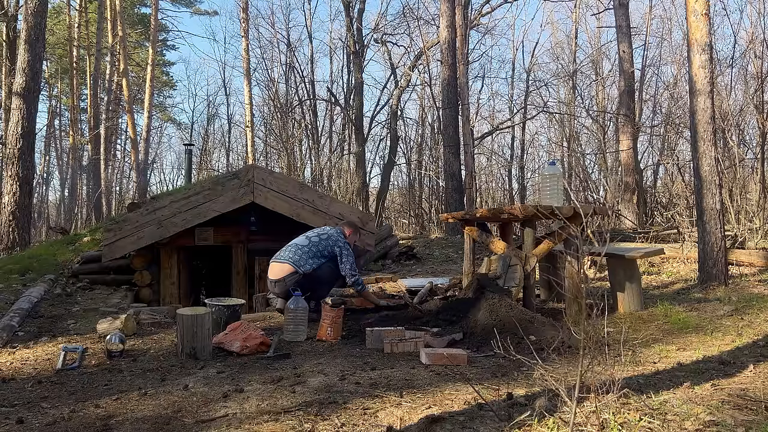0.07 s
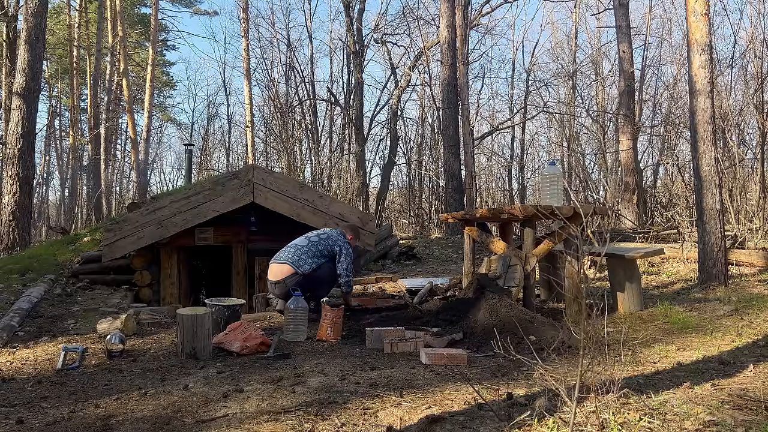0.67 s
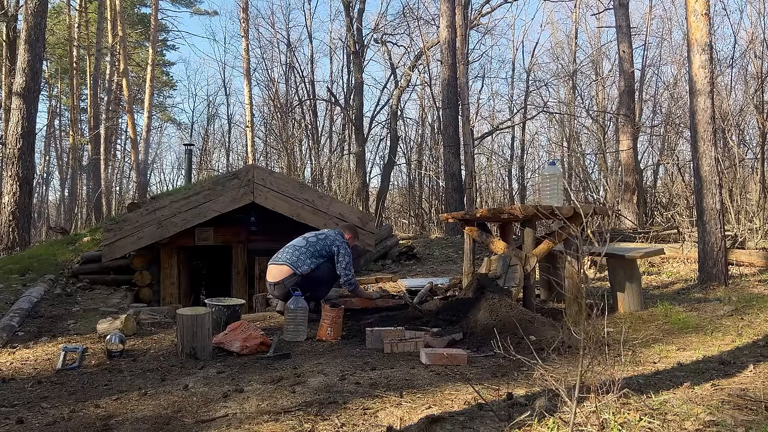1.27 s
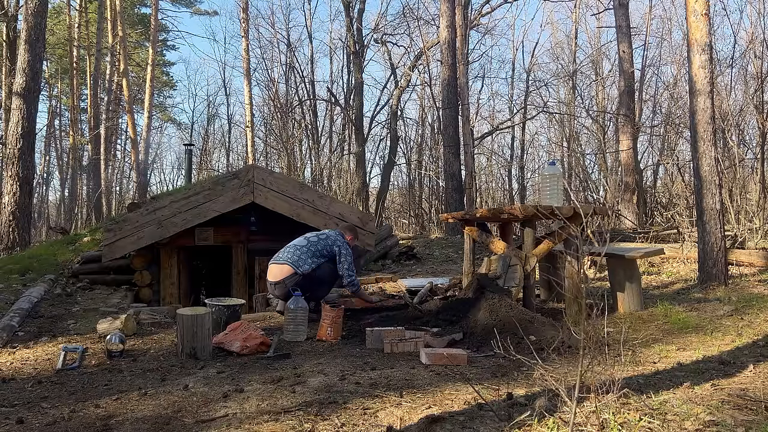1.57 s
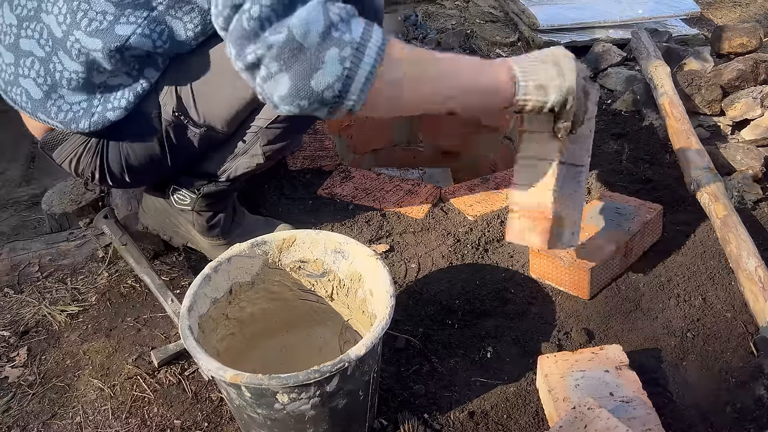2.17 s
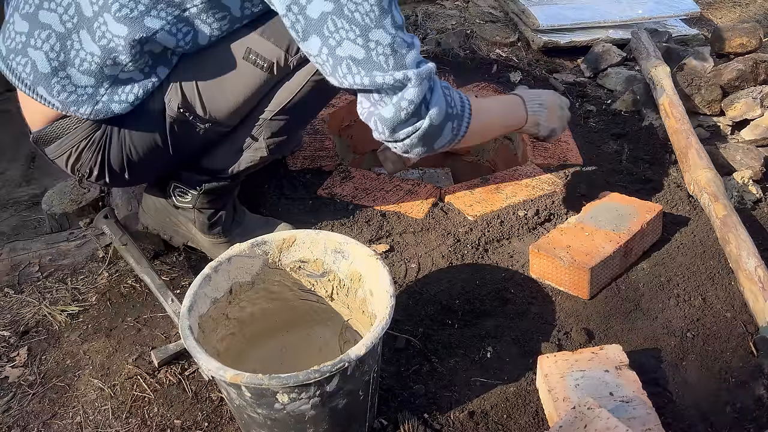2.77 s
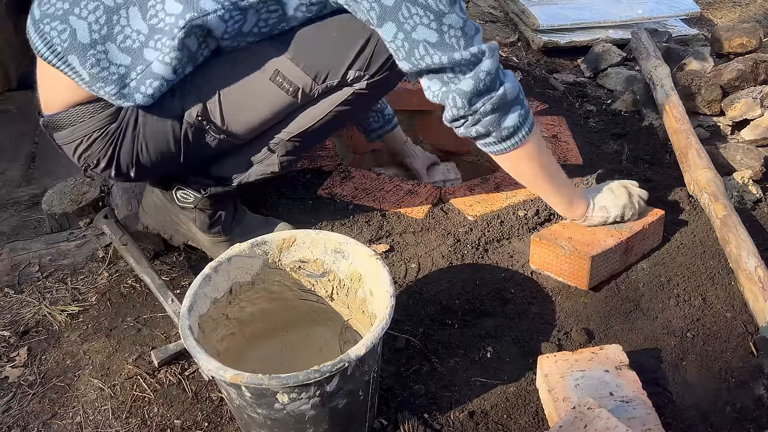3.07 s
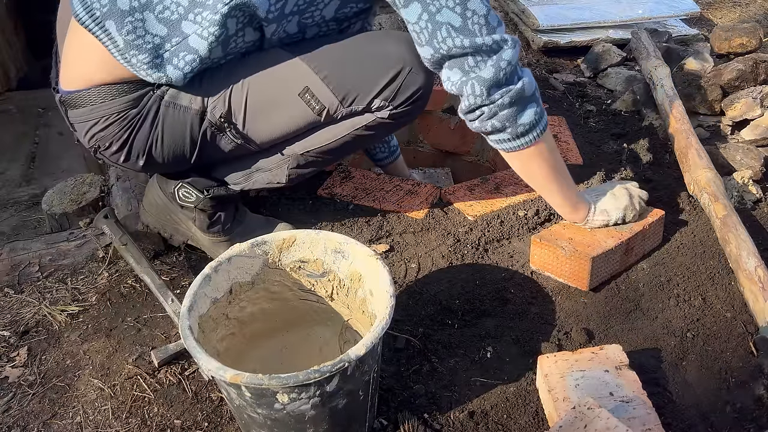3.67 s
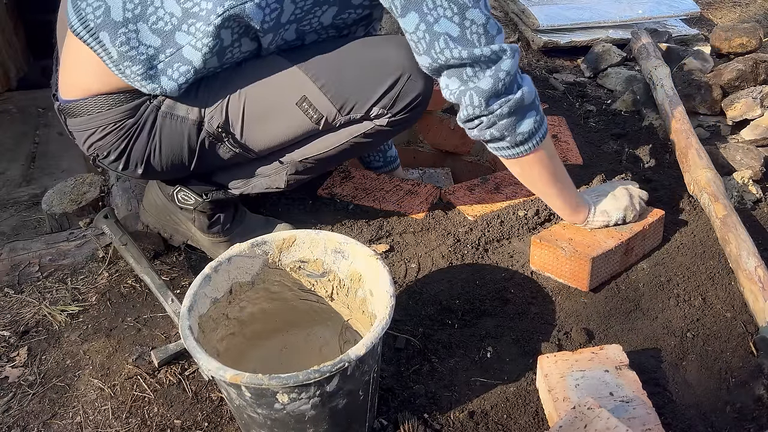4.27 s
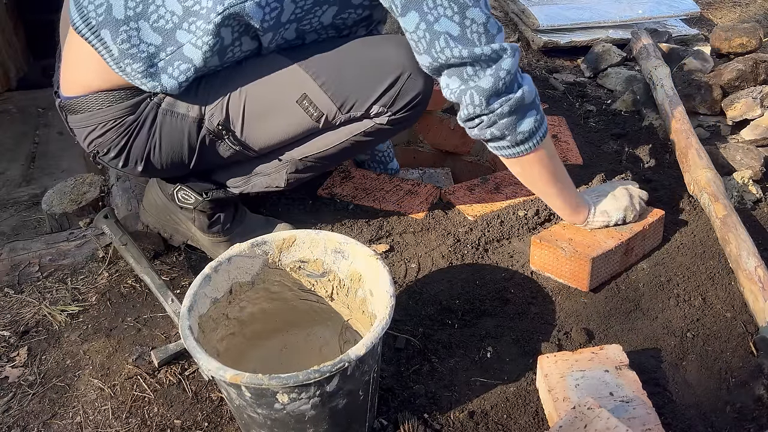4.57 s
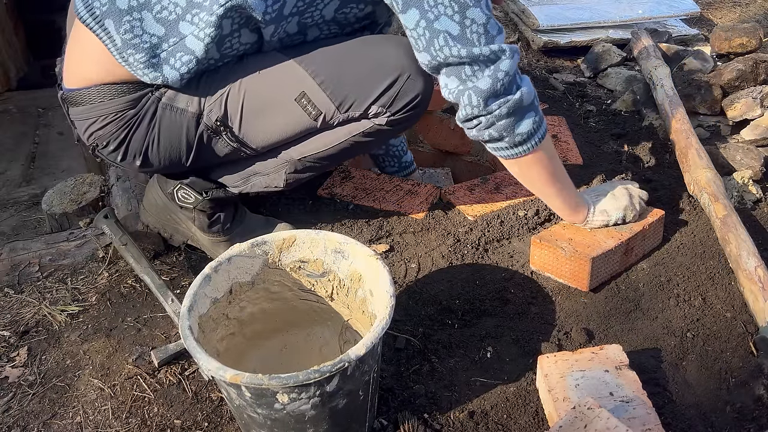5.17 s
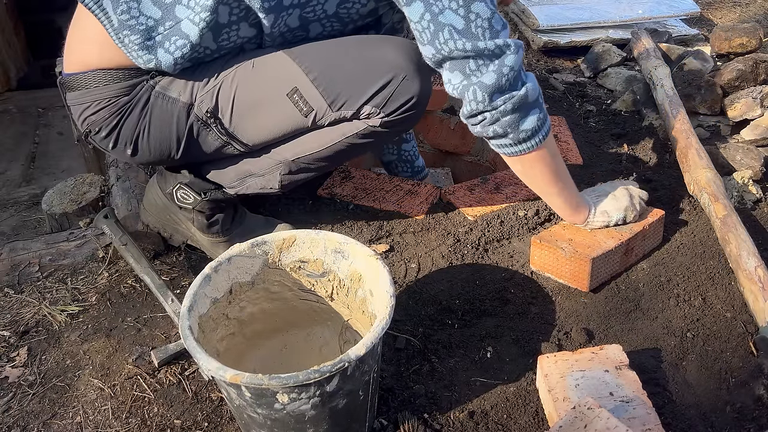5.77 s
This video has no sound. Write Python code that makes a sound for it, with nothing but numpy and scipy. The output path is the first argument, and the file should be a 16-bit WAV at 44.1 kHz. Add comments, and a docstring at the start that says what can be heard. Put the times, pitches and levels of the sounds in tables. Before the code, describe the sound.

Dull, gritty thumps of bricks being set down on soil, close up, amid fabric swishes, soft birdsong and a quiet forest hush.

```python
"""Clay bricks are set down on packed earth and against each other, close up in a forest clearing.
Each landing is a crunch of sand, a short damped knock and a dull thump as the ground gives way.
A brick scrapes through soil, grit crackles, and clothes swish as fabric rubs on fabric.
Behind them a small bird whistles, a farther one warbles through the trees,
and light gusts rumble on the microphone over the hush of the forest."""
import sys
import numpy as np
from scipy import signal
from scipy.fft import rfft, irfft
from scipy.io import wavfile
from scipy.ndimage import uniform_filter1d

SR = 44100
rng = np.random.default_rng(int(sys.argv[2]) if len(sys.argv) > 2 else 0)


def dump_mix(stems):
    """Bounce the given channels to the path in sys.argv[1] as a 16-bit WAV at rate SR."""
    frames = np.atleast_2d(stems).T  # one column per channel
    limited = np.clip(frames, -1, 1)  # hard clip at full scale
    pcm = np.round(limited * 32767).astype(np.int16)
    wavfile.write(sys.argv[1], SR, pcm)


N = 264996
TIME = np.arange(N) / SR
FREQS = np.fft.rfftfreq(N, 1 / SR)


# Weight landing on earth: start_s, level_db, pitch_hz, rebound_gain_db
LANDINGS = [(1.452, -20.5, 140, -3.5), (1.651, -35, 496, 5), (1.668, -17, 145, -8),
            (1.7146, -29.5, 500, -13), (2.150, -32, 227, -2), (2.208, -33, 69, -3.5), (2.259, -34, 53, -8),
            (2.3225, -42.5, 385, -1.5), (2.42, -32, 62, -23), (2.9265, -36, 750, -16),
            (3.182, -40.5, 234, -3), (3.4513, -10.2, 121.5, -16.5), (3.608, -27, 63, -29),
            (3.6447, -31, 82.3, -9), (4.305, -31.5, 60.3, -16), (4.843, -24.5, 67.6, -20),
            (5.0, -21.5, 123.5, -19), (5.692, -38.5, 179, -22)]

def ground_thuds(rise_cycles=1.35):
    """The earth thumps, the brick rocks faster on it, and the wider ground rebounds lower and slower."""
    out, t = np.zeros(N), np.arange(SR // 2) / SR
    for start, db, hz, rebound_db in LANDINGS:
        rise = rise_cycles / hz  # low thuds have a softer attack
        body = thump(t, hz, rise, steepness=2.6)
        rocking = undb(-22) * thump(t, hz * 2.13, rise * 0.96, steepness=3.0)
        rebound = undb(rebound_db) * thump(t, hz * 0.545, rise * 2.92, steepness=4.9)
        add(out, start, undb(db) * (body + rocking + rebound))
    return out


def thump(t, hz, rise, steepness, sag=0.025):
    """Soil gives way and springs back for a few cycles; the pitch sags as the load comes off."""
    swell = (t / rise * np.exp(1 - t / rise)) ** steepness
    pitch = hz * (1 + sag * (2 * np.exp(-t / rise / 2) - 1))
    return swell * np.sin(2 * np.pi * np.cumsum(pitch) / SR)


# A brick touching down: start_s, level_db, grind_s, brightness_hz, knock_gain_db, flat_gain_db
TOUCHDOWNS = [(1.4435, -30.5, 0.014, 2180, 0.5, -8), (1.6682, -26.5, 0.0034, 2500, 0.5, -10.5),
              (2.1515, -33.5, .004, 1900, 1.5, -9), (2.9258, -37, 0.0043, 1260, -4.5, -4),
              (3.1803, -32.5, .0035, 1880, -1.5, -8), (3.4450, -38, 0.01, 1680, 7.5, 4.5),
              (3.505, -45, 0.0043, 1200, -15, -10), (3.5758, -47.5, 0.003, 2000, -14, -2),
              (5.916, -43.5, 0.0019, 2000, -7, -15)]

def brick_contacts(flat_delay_s=0.01, flat_grind_s=0.0093):
    """Each brick crunches and knocks twice: first on an edge, then duller as its face falls flat."""
    out, t = np.zeros((2, N)), np.arange(SR // 5) / SR
    for edge_s, edge_db, edge_grind_s, edge_hz, knock_db, flat_db in TOUCHDOWNS:
        edge = (edge_s, edge_db, edge_grind_s, edge_hz)
        face = (edge_s + flat_delay_s, edge_db + flat_db, flat_grind_s, edge_hz * 0.57)
        for start, db, grind_s, bright_hz in (edge, face):
            crunch = sand_crunch(t, grind_s, bright_hz)
            knock = undb(knock_db) * brick_knock(t, grind_s, bright_hz)
            add(out, start, undb(db) * (crunch + knock))
    return out


def sand_crunch(t, grind_s, bright_hz, width=0.62):
    """Sand crushes between the faces in a burst of grainy noise."""
    mid, side, size = rng.standard_normal((3, len(t)))
    grains = np.array([mid + width * side, mid - width * side]) * undb(4 * size)
    envelope = (t / grind_s * np.exp(-2 * t / grind_s)) ** 1.8
    band = signal.butter(1, [450, bright_hz], "band", fs=SR, output="sos")
    lowpass = signal.butter(2, 2 * bright_hz, fs=SR, output="sos")
    crunch = signal.sosfilt(np.vstack([band, lowpass]), grains * envelope)
    return crunch / abs(crunch).max()


# Modes of a brick damped by soil and glove: pitch_hz, t60_s, level_db
BRICK_MODES = [(237, 0.069, 3.5), (298, 0.022, 2), (395, 0.075, -1), (568, 0.045, -3.5), (822, 0.049, -4),
               (1263, 0.026, 0), (1620, 0.012, -36), (2287, 0.022, -0.5), (2890, 0.011, -42)]

def brick_knock(t, grind_s, bright_hz, detune=0.059):
    """The blow rings the brick briefly; its size shifts the tuning and the struck spot the balance."""
    hz, t60, db = np.transpose(BRICK_MODES)[:, :, None]
    tuning, spot = rng.standard_normal((2, len(BRICK_MODES), 1))
    weight = undb(db + 2 * spot) / (1 + (hz / bright_hz) ** 2) * np.sign(tuning)
    modes = np.sin(2 * np.pi * hz * (1 + detune * tuning) * t) * np.exp(-np.log(1000) * t / t60)
    attack = 1 - np.exp(-2 * t / grind_s)
    ring = (weight * modes).sum(0) * attack
    return ring / abs(ring).max()


# Tone of scraped soil: frequency_hz, level_db
SOIL_TONE = [(100, 4), (350, 10), (650, 2), (900, 1), (1200, -3), (1600, -2), (2200, -3.5), (3000, -7.5),
             (5000, -7), (9000, -27)]
# Brick and glove pushing through soil: peak_s, length_s, level_db, hollow_hz
PUSHES = [(1.75, 0.029, -53.5, 1150), (2.345, 0.46, -58.5, 412), (2.515, 0.12, -49.5, 540),
          (2.685, 0.15, -48, 620), (2.903, 0.098, -47.5, 1660), (3.1, 0.08, -52.5, 1030),
          (3.242, .11, -47, 1000), (3.496, 0.22, -58, 940), (4.318, 0.27, -67.5, 1700),
          (5.069, 0.078, -56.5, 477), (5.378, 0.061, -48.5, 1520), (5.704, .18, -53.5, 440),
          (5.982, 0.046, -53, 596)]

def brick_scrapes(rasp_hz=1760):
    """Each push grinds loose soil; the gap under the brick sounds hollow and the rough face rasps."""
    out = 0
    soil = texture(SOIL_TONE, grain_db=0.6, grain_hz=300) * undb(1.44 * drift(35))
    rasp = undb(4) * resonate(soil, rasp_hz, q=0.94) + undb(-10) * soil
    for peak_s, length, db, hollow_hz in PUSHES:
        scrape = undb(-1) * resonate(soil, hollow_hz, q=3.6) + rasp
        out += undb(db) * stroke(peak_s, length) * scrape / scrape.std()
    return out


# Grit cracking under a brick: start_s, peak_db, decay_s, pitch_hz
CRACKLES = [(1.321, -43, .0024, 11000), (1.447, -38, 0.0026, 12000), (1.6700, -43, 0.0023, 2600),
            (1.6704, -29, .0018, 12000), (2.085, -44.5, 0.015, 4830), (3.451, -29, 0.0065, 9150),
            (3.628, -67, .003, 9000), (3.895, -49, 0.015, 8000), (4.03, -49.5, 0.018, 9000),
            (5.496, -41, 0.0013, 7000)]

def grit_crackles(crumb_count=60):
    """Grit cracks in short, bright bursts; smaller crumbs of soil tick faintly at random."""
    out, t = np.zeros((2, N)), np.arange(SR // 20) / SR
    crumbs = [(when * N / SR, -62 - 3 * np.log(faintness + 0.03), 0.001, 3000 * 3 ** pitch)
              for when, faintness, pitch in rng.random((crumb_count, 3))]
    for start, db, decay_s, hz in CRACKLES + crumbs:
        mid, side, size = rng.standard_normal((3, len(t)))
        grains = np.array([mid + 0.26 * side, mid - 0.31 * side]) * undb(6.4 * size)
        crackle = resonate(grains * np.exp(-t / decay_s), hz, q=1)
        add(out, start, undb(db) * crackle / abs(crackle).max())
    return out


# Tone of the fine fibre hiss: frequency_hz, level_db
FIBRE_TONE = [(1000, -12), (3000, -5.5), (5000, -3.5), (7000, -1), (8600, 1.5), (11000, .5), (13000, -1),
              (15800, -.5)]
# Tone of the swishing folds: frequency_hz, level_db
FOLD_TONE = [(200, 10.5), (900, 0.5), (1800, 4.5), (2600, 0.5), (4000, -0.5), (6000, -0.5), (8500, -2.5),
             (14000, -76)]
# Silky sheen on top of the hiss: time_s, gain_db
SHEEN = [(0, 8), (1.1, 10), (1.3, -13.5), (2.1, -3.5), (6, -3)]
# Faint hiss between sweeps: time_s, level_db
HISS_BED = [(0, -69), (2.1, -73), (3.6, -68.5), (4.7, -83), (5.55, -64), (6, -76)]
# Sweeps of a sleeve or trouser leg, plus one long, faint swell of background hiss near 1.4 s:
# peak_s, length_s, swish_db, swish_hz, hiss_db
SWISHES = [(0.132, 0.073, -57.5, 4300, -58.5), (0.295, .13, -51, 4500, -55.5),
           (0.452, 0.07, -60, 4000, -61), (0.618, 0.1, -52, 4040, -56.5), (0.772, 0.15, -45, 3730, -55),
           (1.064, .11, -48, 4530, -55), (1.43, 0.78, -62, 3500, -65.5), (1.771, 0.052, -57, 3700, -52),
           (1.902, 0.12, -58, 4400, -56), (2.488, 0.48, -65.5, 3500, -60), (2.68, 0.06, -66, 3500, -55.5),
           (2.96, 0.17, -52.5, 3330, -55.5), (3.187, 0.21, -63.5, 3580, -56.5),
           (3.419, 0.054, -52.5, 3920, -52), (3.758, .025, -81, 4000, -66.5),
           (4.297, 0.032, -58, 2870, -60), (4.425, 0.2, -72, 3520, -72), (5.042, 0.077, -62, 3500, -59.5),
           (5.344, .13, -50, 3150, -52), (5.717, 0.16, -53, 3230, -53), (5.991, 0.061, -57.5, 2700, -55)]

def clothes_rustle(sheen_hz=11000, settle_s=0.085):
    """Fabric slides over fabric: countless fibres hiss, and each sweep adds a coarser swish."""
    fibres = texture(FIBRE_TONE, grain_db=1.5, grain_hz=550) * undb(1.27 * drift(45))
    folds = texture(FOLD_TONE, grain_db=1.34, grain_hz=330)
    swish, hiss_power = 0, automation(HISS_BED) ** 2
    for peak_s, length, swish_db, hz, hiss_db in SWISHES:
        voice = resonate(folds, hz, q=1.33) + undb(-7) * folds
        swish += undb(swish_db) * stroke(peak_s, length) * voice / voice.std()
        # The hiss outlasts the swish: it holds while the cloth touches, then tails off as it settles.
        touching = stroke(peak_s, length * 1.31, squareness=4)
        settling = undb(-4.5) * (TIME > peak_s) * np.exp(-abs(TIME - peak_s) / settle_s)
        hiss_power += (undb(hiss_db) * np.maximum(touching, settling)) ** 2
    sheen = automation(SHEEN) * resonate(fibres, sheen_hz, q=7)
    return (fibres + sheen) * np.sqrt(hiss_power) + pan(swish, right_db=4)


# Whistled notes: start_s, length_s, pitch_hz, level_db; the faint note at 1.19 s echoes the one before it
BIRD_NOTES = [(.66, 0.062, 4225, -49), (1.088, .1, 4280, -51), (1.19, .08, 4305, -62),
              (1.545, 0.038, 4200, -58), (1.598, 0.068, 4260, -56.5), (1.985, 0.057, 4260, -58.5)]

def birds(warble_every_s=0.43, warble_hz=3420):
    """To the right, one bird whistles level notes; another's rising warble is heard only as echo."""
    warbles = [(0.39 + k * warble_every_s, 0.11, warble_hz, -55.5) for k in range(3)]
    near = whistle(BIRD_NOTES, waver=0.003)
    far = whistle(warbles, waver=0.025, glide=0.16)
    near_echo = undb(-1) * tree_echoes(near, t60=0.73, top_hz=9000)
    far_echo = tree_echoes(far, t60=0.4, top_hz=9000)
    return pan(near + near_echo + far_echo, right_db=4)


def whistle(notes, waver, glide=0):
    """Near-pure notes swell and fade, with a wavering pitch that may slide upward."""
    out, wobble = np.zeros(N), 1 + waver * drift(110)
    for start, length, hz, db in notes:
        progress = np.linspace(0, 1, int(length * SR))
        pitch = hz * (1 + glide * progress) * wobble[int(start * SR):][:len(progress)]
        swell = np.sqrt(abs(np.sin(np.pi * progress)))
        add(out, start, undb(db) * swell * np.sin(2 * np.pi * np.cumsum(pitch) / SR))
    return out


def tree_echoes(x, t60, top_hz):
    """Trunks scatter the sound into a thin tail, different on each side."""
    t = np.arange(SR) / SR
    envelope = np.exp(-np.log(1000) * t / t60) * (1 - np.exp(-t / 0.0017))
    tail = rng.standard_normal((2, SR)) * envelope
    tail /= np.sqrt((tail ** 2).sum(1, keepdims=True))
    tail = signal.sosfilt(signal.butter(1, [180, top_hz], "band", fs=SR, output="sos"), tail)
    return signal.fftconvolve(np.atleast_2d(x), tail, axes=1)[:, :N]


# Tone of the wind rumble: frequency_hz, level_db
RUMBLE_TONE = [(15, -62), (28, -9), (45, 0), (65, 1.5), (100, -9), (160, -35.5), (300, -34.5), (700, -51)]
# Gusts on the microphone: peak_s, length_s, level_db
WIND_GUSTS = [(.1, 0.65, -51.5), (.68, 0.33, -45), (1.585, 0.31, -40), (2.217, 0.42, -42.5),
              (3.566, .24, -43.5), (4.843, 0.33, -45)]

def wind_rumble(breeze_db=-59):
    """Gusts rise out of a light breeze and buffet the microphone."""
    gusts = sum(undb(db) * stroke(peak_s, length, squareness=2.34) for peak_s, length, db in WIND_GUSTS)
    return texture(RUMBLE_TONE, grain_db=4.5, grain_hz=23) * (undb(breeze_db) + gusts)


# Tone of the forest air: frequency_hz, level_db
HUSH_TONE = [(40, 4.5), (120, 4.5), (220, -0.5), (350, -7), (580, -9.5), (900, -15), (1350, -21),
             (1800, -17.5), (2500, -27), (3600, -20.5), (6000, -29.5), (15000, -46)]
# Level of the forest air over time: time_s, level_db
HUSH_LEVEL = [(0, -47), (1.7, -49), (2.3, -55.5), (4.6, -58.5), (6.0, -55)]

def forest_hush():
    """A soft, dark bed of forest air, fullest at the start."""
    return texture(HUSH_TONE, grain_db=1.84, grain_hz=25) * automation(HUSH_LEVEL)


# How alike left and right are in the noise layers: frequency_hz, correlation
STEREO_IMAGE = [(30, .93), (130, .96), (280, .8), (550, .54), (1500, .56), (3500, .55), (6000, .38),
                (8000, .55), (9500, .94), (12000, .92), (16000, .85)]

def texture(tone, grain_db, grain_hz):
    """Stereo noise of a given tone, broken into grains of uneven level; the mid has rms 1."""
    grains = rng.standard_normal((2, N)) * undb(grain_db * drift(grain_hz))
    alike = spectrum(STEREO_IMAGE)
    width = np.sqrt((1 - alike) / (1 + alike))
    mid, side = rfft(grains) * undb(spectrum(tone))
    mid, side = irfft(mid, N), irfft(side * width, N)
    return np.array([mid + side, mid - side]) / mid.std()


def stroke(peak_s, length, squareness=1.88, attack_share=0.55):
    """Envelope of a movement that gathers speed until peak_s, then slows to a stop."""
    slope_s = length * np.where(TIME < peak_s, attack_share, 1 - attack_share)
    return np.exp(-0.5 * abs((TIME - peak_s) / slope_s) ** squareness)


def drift(rate_hz):
    """Smooth random modulation with a spread near 1."""
    hold = int(SR / rate_hz)
    steps = np.repeat(rng.standard_normal(N // hold + 1), hold)
    return 1.25 * uniform_filter1d(steps, hold)[:N]


def resonate(x, hz, q):
    """One resonance with gain 1 at its centre; q is held to at least 1."""
    return signal.lfilter(*signal.iirpeak(hz, max(q, 1), fs=SR), x)


def spectrum(points):
    """Join (frequency_hz, value) points on a log-frequency axis."""
    hz, value = np.transpose(points)
    return np.interp(np.log(FREQS + 1), np.log(hz), value)


def automation(points):
    """Gain curve through (time_s, level_db) points."""
    return undb(np.interp(TIME, *np.transpose(points)))


def pan(x, right_db):
    """Tilt the balance so the right side is right_db above the left."""
    return x * undb(np.array([[-right_db], [right_db]]) / 2)


def undb(db):
    """Decibels to gain."""
    return 10 ** (np.asarray(db) / 20)


def add(out, start_s, x):
    """Mix a short sound in at start_s."""
    i = int(start_s * SR)
    out[..., i:i + x.shape[-1]] += x[..., :N - i]


def scene():
    """Bricks and their echoes up front, the worker's movements close by, the forest behind."""
    bricks = ground_thuds() + brick_contacts()
    echoes = undb(-10) * tree_echoes(bricks, t60=0.22, top_hz=4000)
    handling = clothes_rustle() + brick_scrapes() + grit_crackles()
    return bricks + echoes + handling + birds() + wind_rumble() + forest_hush()


def record(dry, lag_above_hz=7100, lag_s=0.000205, top_hz=15800):
    """In the high treble the right channel lags the left, slightly phasey; a low-pass cuts the top."""
    left, right = rfft(dry)
    right = right * np.exp(-2j * np.pi * lag_s * np.maximum(FREQS - lag_above_hz, 0))
    lowpass = signal.ellip(10, 0.2, 80, top_hz, fs=SR, output="sos")
    return signal.sosfilt(lowpass, irfft(np.array([left, right]), N))


dry = scene()
out = record(dry)
dump_mix(out)
```